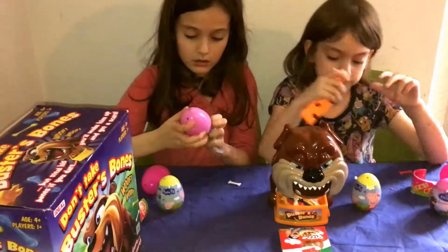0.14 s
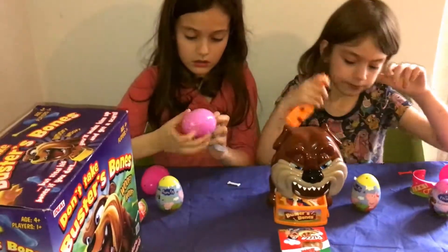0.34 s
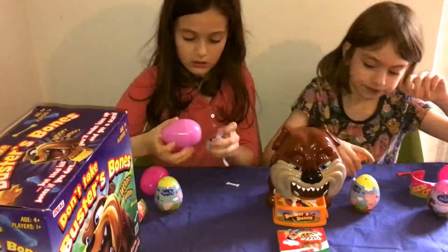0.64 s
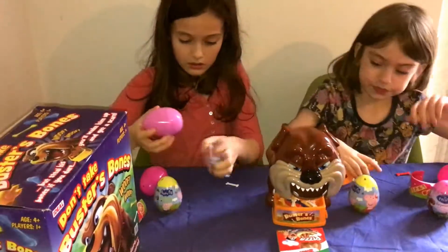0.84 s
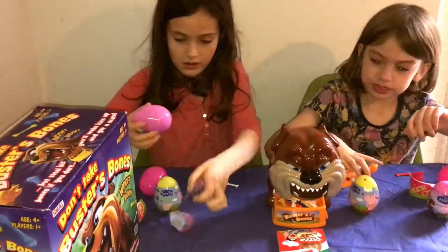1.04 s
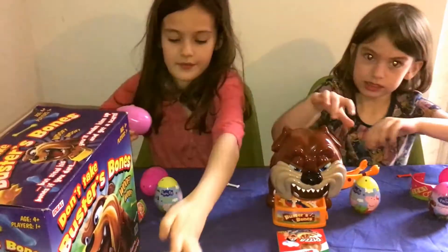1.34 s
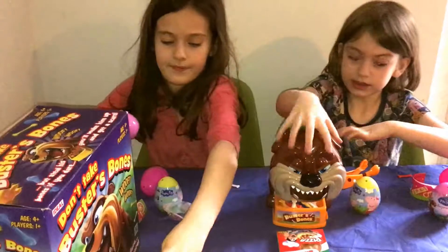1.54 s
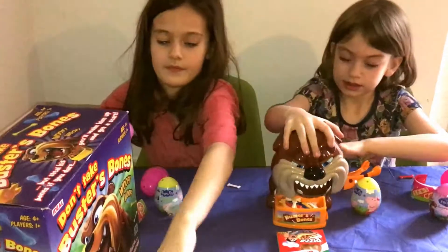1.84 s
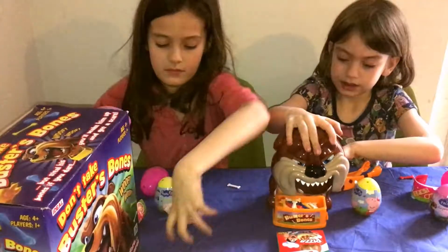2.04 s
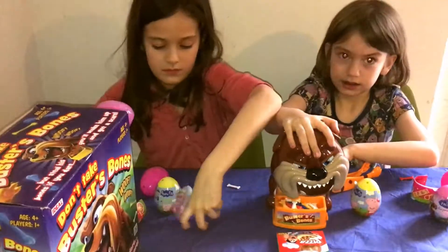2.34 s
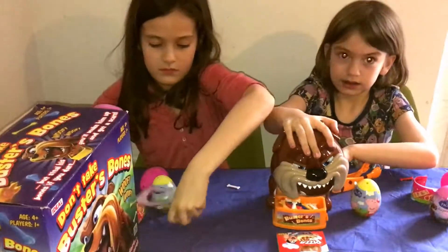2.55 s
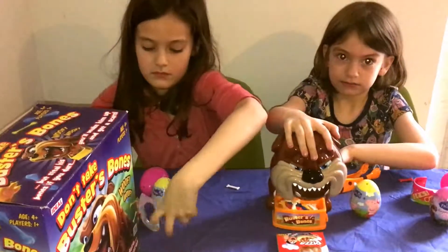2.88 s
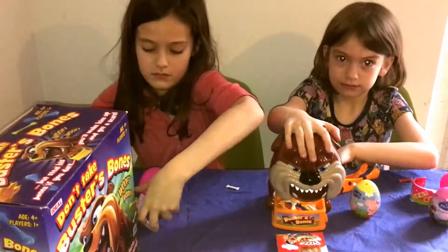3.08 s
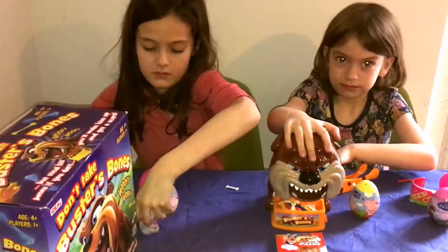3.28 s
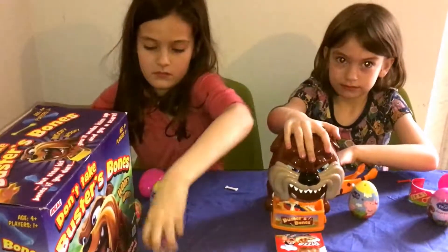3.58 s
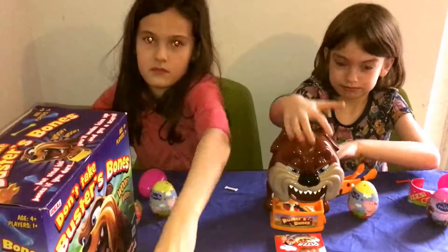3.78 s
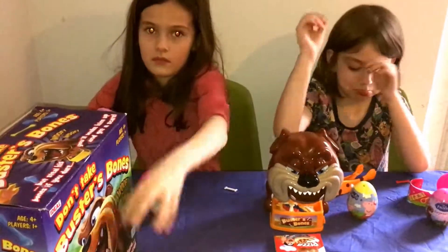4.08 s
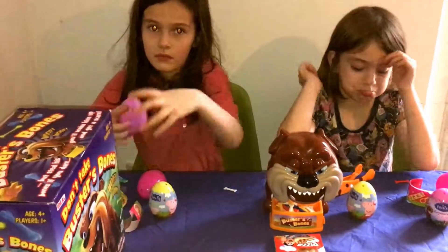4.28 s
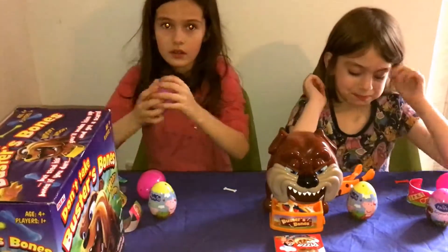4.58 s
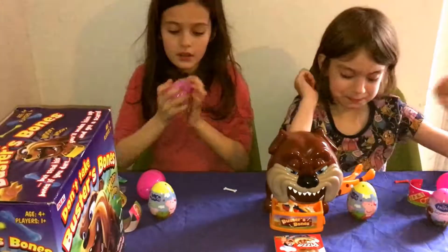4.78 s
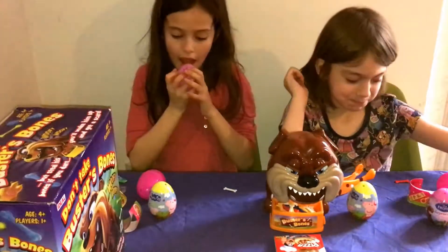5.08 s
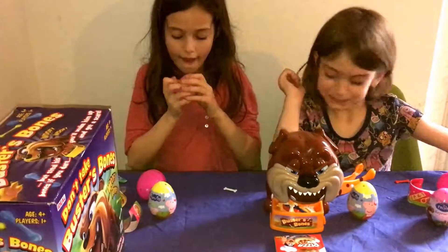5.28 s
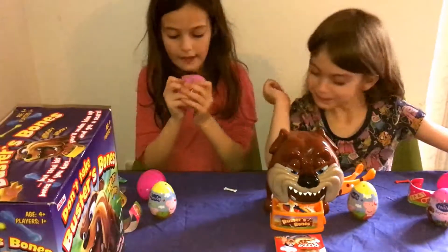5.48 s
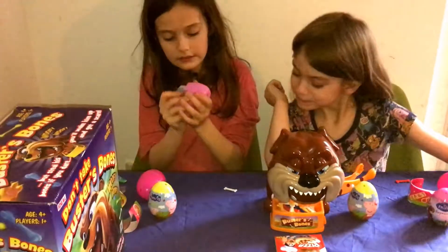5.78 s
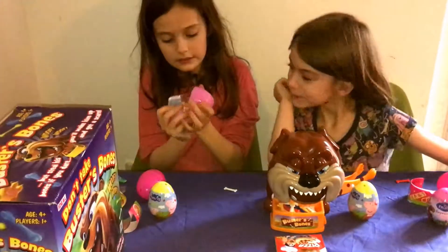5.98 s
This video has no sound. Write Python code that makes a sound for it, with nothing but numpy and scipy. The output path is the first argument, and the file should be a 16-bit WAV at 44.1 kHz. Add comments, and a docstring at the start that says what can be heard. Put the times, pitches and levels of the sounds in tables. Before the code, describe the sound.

In a small quiet room, close to the microphone, thin plastic film is crumpled with dense bright crackles and sharp snaps for the first second, thinning out. An arm rustles faintly over cloth. After a pause come hard plastic clicks, dull thuds on the table, then a plastic egg clicks apart with a brief hollow rub rising in pitch.

```python
"""In a small room, at a cloth-covered table, thin plastic wrap is pulled off a toy egg and dropped.
The wrap crackles and snaps as bursts of noise through ringing filters, an arm rustles over the cloth,
and filtered bursts and short low notes make the knocks on the table and the toys on it.
Then the plastic egg is squeezed until it clicks apart, and the air inside, noise through one gliding
resonance, rings higher and higher, with a small fall at the end, as the gap between its halves widens."""
import sys
import numpy as np
from scipy import signal
from scipy.fft import rfft, irfft
from scipy.io import wavfile
from scipy.ndimage import uniform_filter1d

SR = 44100
rng = np.random.default_rng(int(sys.argv[2]) if len(sys.argv) > 2 else 0)


def persist_wave(psi):
    """Save psi, clipped to +-1, as 16-bit WAV."""
    counts = np.round(np.clip(psi, -1, 1) * 32767).astype(np.int16)
    wavfile.write(sys.argv[1], SR, np.atleast_2d(counts).T)


N = 270156  # length in samples
TIME = np.arange(N) / SR  # seconds
HZ = np.fft.rfftfreq(8192, 1 / SR)  # frequencies at which the filters are drawn


def amp(db):
    """Decibels to gain."""
    return 10 ** (np.asarray(db) / 20)


def evened(x):
    """Scales to an rms of one."""
    return x / np.sqrt(np.mean(x ** 2) + 1e-20)


def read(points, hz):
    """Reads a curve of (Hz, value) points on a log-frequency axis."""
    point_hz, value = np.transpose(points)
    return np.interp(np.log(hz + 1), np.log(point_hz + 1), value)


def level(rows, attack_s, release_s):
    """Gain over time of hand movements (start, length, dB): each builds, holds and dies away."""
    gain = np.zeros(N)
    for start, length, db in rows:
        build = np.clip((TIME - start) / attack_s, 0, 1)
        fade = np.exp(-np.maximum(TIME - start - length, 0) / release_s)
        gain += amp(db) * build * fade
    return gain


def add(mix, s, sound):
    """Adds a sound at its time."""
    part = mix[max(round(s * SR), 0):][:len(sound)]
    part += sound[:len(part)]


def colour(x, tone):
    """Gives a steady sound its balance of bass and treble, at an rms of one."""
    gain = amp(read(tone, np.fft.rfftfreq(N, 1 / SR)))
    return evened(irfft(rfft(x) * gain, N))


def causal(gain):
    """The filter with this gain that starts at once and rings afterwards (minimum phase)."""
    log_gain = np.log(np.maximum(gain, 1e-5))
    circle = np.concatenate([log_gain, log_gain[-2:0:-1]])
    return irfft(np.exp(np.conj(signal.hilbert(circle)))[:len(gain)])


def resonance(ring_hz, sharpness):
    """Gain of something that answers most at one pitch: one there, less on either side."""
    return 1 / np.hypot(1, sharpness * (HZ / ring_hz - ring_hz / (HZ + 1)))


def burst(decay, rise=0, count=4):
    """A flurry of tiny contacts that builds and dies, with a nearly even spectrum and unit energy."""
    t = np.arange(1, 2 * len(HZ) - 1) / SR
    build = 1 - np.exp(-t / max(rise, 1e-6))
    fall = np.exp(-t / max(decay, 1e-4)) * build
    x = rng.standard_normal(len(fall)) * fall
    for _ in range(count):
        # flatten the spectrum, then shape the burst in time again
        flat = irfft(np.exp(1j * np.angle(rfft(x))))
        x = flat * np.sqrt(fall)
    return x / np.linalg.norm(x)


def snap(decay, ring_hz, ring_db, tone, crack):
    """A sudden give: one sharp crack and a short flurry, through a broad resonance."""
    ring = 1 + (amp(ring_db) - 1) * resonance(ring_hz, sharpness=3)
    force = (burst(decay) + crack * burst(0.00075)) / np.hypot(1, crack)
    return signal.fftconvolve(force, causal(ring * amp(read(tone, HZ))))


def grains(per_s, spread_db):
    """A random train of tiny clicks, a few much larger than the rest."""
    size = amp(spread_db * np.minimum(rng.exponential(1, N), 4))
    push = size * rng.standard_normal(N)
    happens = rng.random(N) < per_s / SR
    return push * happens


def sing(hz, width_hz):
    """Rubbing noise in one resonance, steady or gliding, at an rms of one."""
    turn = np.exp(2j * np.pi * np.cumsum(hz * np.ones(N)) / SR)
    r = np.exp(-np.pi * width_hz / SR)
    # shift the noise down by the note, keep its slow part, shift it back up
    slow = signal.lfilter([1], [1, -2 * r, r * r], rng.standard_normal(N) / turn)
    return evened((slow * turn).real)


# How long the room's tail takes to fade by 60 dB. Each row: frequency in Hz, time in seconds.
ROOM_FADE = [(150, 0.65), (400, 0.16), (1000, 0.44), (2800, 0.26), (7000, 0.26), (15000, 0.11)]


def room(x, wet_db, echo_db, count=3):
    """Table and near walls answer within 20 ms; a dense tail follows, each pitch fading at its own pace."""
    out = x.copy()
    for k in range(count):
        hz, t, z = signal.stft(rng.standard_normal(SR // 2), SR, nperseg=256)
        fade = amp(-60 * t / read(ROOM_FADE, hz)[:, None])
        tail = signal.istft(z * fade, SR, nperseg=256)[1]
        tail *= np.minimum(np.arange(len(tail)) / SR / 0.001, 1)  # no hard edge at the start
        response = amp(wet_db) * tail / np.linalg.norm(tail)
        for delay, share in [(.0022, 0.96), (.0075, 1), (.0128, 1), (.0162, 0.56)]:  # delay in s
            add(response, delay, share * amp(echo_db) * burst(0.00039))
        # the hands move, so each sound meets a different mix of paths
        place = np.cos(np.pi * (TIME / .11 + k / count)) * np.sqrt(2 / count)
        out += signal.oaconvolve(x * place, response)[:N]
    return out


# The balance of the quiet room. Each row: frequency in Hz, gain in dB.
QUIET_TONE = [(20, -9.5), (55, 10.5), (100, -0.5), (200, 4.5), (320, -11.5), (500, -36.5), (1000, -10),
              (2200, -16.5), (5000, -14), (16000, -22.5)]


def room_tone():
    """The faint steady tone of the room: coloured noise."""
    return amp(-71) * colour(rng.standard_normal(N), QUIET_TONE)


def uneven(x, patchy_db):
    """Changing pressure lets narrow bands swell and fade for some 50 ms."""
    z = signal.stft(x, SR, nperseg=1024)[2]
    patches = uniform_filter1d(rng.standard_normal(z.shape), size=4, axis=0)  # across pitch
    patches = evened(uniform_filter1d(patches, size=5, axis=1))  # across time
    return evened(signal.istft(z * amp(patchy_db * patches), SR, nperseg=1024)[1][:N])


# The balance of an arm sliding on cloth. Each row: frequency in Hz, gain in dB.
CLOTH_TONE = [(60, -7.5), (200, -1.5), (330, 9), (460, -1.5), (580, 2), (800, -3.5), (1400, -9), (2200, -4),
              (3500, -14), (8000, -21), (16000, -23)]
# Reaches of a sleeve and arm over the tablecloth. Each row: start in seconds, length in seconds, level in dB.
ARM_REACHES = [(-.2, 0.52, -72), (.35, 0.58, -68.5), (1.3, 0.68, -70.5), (1.85, 0.92, -71),
               (4.1, 0.48, -69), (5.2, 1, -75)]
# A brief hollow rub on the table. Each row: start in seconds, length in seconds, level in dB.
HOLLOW_RUB = [(2.345, 0.028, -55.5)]
# Light scuffs of a hand. Each row: start in seconds, strength in dB, ring in Hz, length setting in seconds.
HAND_SCUFFS = [(2.871, -21.5, 2040, 0.027), (4.249, -24, 2680, .012), (4.362, -21.5, 1850, 0.03),
               (5.697, -23, 2800, 0.021), (5.762, -14, 2110, 0.0095)]
REACH_ATTACK_S, REACH_RELEASE_S, RESTING_ARM_DB = 0.16, 0.1784, -75
RUB_HZ = 557


def cloth():
    """Threads catch and slip under a moving arm; a hollow rub sings; hands scuff over the toys."""
    threads = uneven(colour(grains(2500, 3), CLOTH_TONE), patchy_db=2.2)
    arm = amp(RESTING_ARM_DB) + level(ARM_REACHES, REACH_ATTACK_S, REACH_RELEASE_S)
    out = arm * threads
    out += level(HOLLOW_RUB, attack_s=0.022, release_s=.009) * sing(RUB_HZ, width_hz=31)
    for s, db, ring_hz, length in HAND_SCUFFS:
        band = resonance(ring_hz, sharpness=2.8)
        scuff = signal.fftconvolve(burst(length, rise=length / 2), causal(band))
        add(out, s, amp(db) * scuff)
    return room(out, wet_db=-4, echo_db=-10.5)


# The balance of the plastic film. Each row: frequency in Hz, gain in dB.
FILM_TONE = [(60, -34), (300, -24), (700, -15.5), (1200, -10), (2500, -6.5), (5000, -4.5), (8000, -7),
             (11000, -4), (16000, -7)]
PANEL_LOW_HZ, PANEL_HIGH_HZ = 2300, 7950
SMALL_SNAPS_PER_S, SMALL_RING_DB = 37, 17.5  # the rate is for all panel sizes together


def small_snaps(count=8):
    """Film panels of several sizes, each buckling at random moments."""
    out = np.zeros(N)
    for ring_hz in np.geomspace(PANEL_LOW_HZ, PANEL_HIGH_HZ, count):
        size = rng.uniform(0.33, 1, N)
        happens = rng.random(N) < SMALL_SNAPS_PER_S / count / SR
        one_snap = snap(0.0017, ring_hz, SMALL_RING_DB, FILM_TONE, crack=0.94)
        out += signal.oaconvolve(size * happens, one_snap)[:N]
    return out


# Squeezes of the wrap. Each row: start in seconds, length in seconds, effort in dB.
WRAP_SQUEEZES = [(-.02, .28, -62), (.042, 0.04, -43.5), (.28, 0.029, -50), (.39, 0.21, -47.5),
                 (.715, 0.038, -41), (.8, 0.19, -49.5), (1, 0.17, -62.5), (1.45, 0.091, -51),
                 (1.58, 0.34, -70.5), (2.36, 0.019, -49), (2.402, 0.012, -52), (2.46, .4, -77.5)]
# Buckling snaps of the wrap, placed one by one. Each row: time in seconds, strength in dB, panel ring in Hz,
# ring height in dB (below zero is a dip), decay setting in seconds.
WRAP_SNAPS = [(0.0462, -18, 3460, 8.5, .004), (0.0836, -6.5, 6800, 0, .003), (0.345, -5, 4170, 6, 0.0028),
              (0.3519, -9, 3960, 3.5, 0.0028), (0.3769, -13.5, 6800, 2, 0.0016),
              (.3968, -12, 3050, 12, 0.0051), (0.4299, -5.5, 2780, 22, 0.0028), (0.437, 0.5, 3620, 0, .005),
              (.4551, 3.5, 3040, -7, 0.0017), (0.4703, -12, 5800, 8, .002), (.4971, -9.5, 6000, 13, 0.0039),
              (0.5259, 2.5, 8550, 1.5, .002), (0.6327, -16.5, 6160, 21, 0.0012),
              (0.65, -13, 3680, 14.5, 0.0028), (0.7633, -4, 6250, 2.5, 0.0036),
              (0.796, -4.5, 9000, 3.5, 0.0027), (.887, -13, 5000, 0, .006), (.9092, -9.5, 6160, 4.5, .0014),
              (0.927, -6.5, 6070, 7.5, .005), (.951, -4.5, 5160, -4, 0.0069), (0.954, 2, 4830, 4, 0.0069),
              (1.066, -20, 5440, 4.5, 0.0045), (1.2139, -26, 6000, 18.5, 0.0012),
              (1.3088, -32.5, 5040, 12, 0.0011), (1.3276, -27.5, 5500, 10, .002),
              (1.3594, -27.5, 7200, 8, .002), (1.384, -26.5, 5360, 8.5, 0.0012),
              (1.451, -14.5, 5130, 1.5, 0.0033), (1.4953, -24.5, 5850, 12.5, .002),
              (1.7174, -38, 6630, 16, .0007), (1.7487, -14.5, 8350, 7, .003),
              (2.511, -19.5, 4270, -1.5, 0.0037), (2.576, -35, 3620, 16, .005),
              (2.6044, -31, 3650, 9.5, .003), (2.7656, -40.5, 1980, 23, 0.0055)]
SQUEEZE_ATTACK_S, SQUEEZE_RELEASE_S = 0.0045, 0.018
CRACKLE_DB, SMALL_SNAP_DB = -4, 18.5  # relative to the effort


def wrap():
    """Each squeeze makes the film crackle and snap; the louder snaps are placed singly."""
    crackle = amp(CRACKLE_DB) * colour(grains(600, 5.8), FILM_TONE)
    crackle += amp(SMALL_SNAP_DB) * small_snaps()
    out = level(WRAP_SQUEEZES, SQUEEZE_ATTACK_S, SQUEEZE_RELEASE_S) * crackle
    for s, db, ring_hz, ring_db, decay in WRAP_SNAPS:
        add(out, s, amp(db) * snap(decay, ring_hz, ring_db, FILM_TONE, crack=0.72))
    return room(out, wet_db=-3.0, echo_db=-10)


# The balance of the table's answer. Each row: frequency in Hz, gain in dB.
TABLE_BALANCE = [(60, 12), (250, 1.5), (370, 4.5), (520, -2), (900, 2.5), (1200, -3.5), (2500, -1),
                 (6000, 5.5), (16000, 11)]


def table_top(low_hz, dull_hz):
    """The table's answer to one contact, between its lowest note and the dullness of the touch."""
    bass_cut = 1 + (low_hz / (HZ + 1)) ** 4
    treble_cut = 1 + (HZ / dull_hz) ** 3.38
    return causal(amp(read(TABLE_BALANCE, HZ)) / np.sqrt(bass_cut * treble_cut))


# Two spells in which things on the table jostle and settle.
# Each row: start in seconds, strength in dB, decay in seconds.
TABLE_JOSTLES = [(.74, -57.5, 0.23), (4.27, -53, 0.21)]
# Knocks on the table and toys.
# Each row: time in seconds, strength in dB, frequency in Hz above which it is dull, decay setting in seconds.
TABLE_KNOCKS = [(0.081, -19.5, 3000, 0.007), (0.542, -4, 1170, 0.0067), (0.554, -1, 316, 0.0073),
                (.683, -1, 1450, .009), (.718, -9.5, 2000, 0.0042), (1.127, -16.5, 910, 0.029),
                (1.479, -18.5, 1060, 0.0099), (1.956, -5.5, 1940, 0.0089), (2.004, -13, 1510, 0.0065),
                (3.771, -8, 830, 0.015), (4.033, -6, 2000, 0.009), (4.223, 6, 410, 0.0066),
                (4.256, -0.5, 550, 0.0062), (4.372, -12, 1090, 0.0114), (4.54, -14.5, 1150, 0.0136),
                (4.868, -11, 2060, 0.0055), (5.252, -12, 592, 0.013), (5.272, -3.5, 330, .013),
                (5.4503, -4.5, 640, 0.01), (5.863, -8, 390, 0.0082), (6.071, -7, 1640, 0.014)]
# Low notes of the table top and hollow toys, most of them close to a knock.
# Each row: time in seconds, peak of the swell in dB, note in Hz, decay in seconds.
TABLE_THUMPS = [(0.547, -34.5, 189, 0.0043), (0.683, -38.5, 334, 0.013), (.69, -37, 891, 0.021),
                (1.956, -50.5, 361, 0.058), (4.221, -28, 398, 0.0039), (4.224, -39, 264, 0.012),
                (4.238, -43, 102, 0.03), (4.728, -48.5, 72, 0.02), (5.283, -42.5, 135.5, 0.023),
                (5.289, -49.5, 65, 0.035), (5.859, -39, 168, 0.019), (5.947, -55, 158.5, 0.028),
                (6.075, -40, 140, 0.039)]
KNOCK_LOW_HZ, KNOCK_RISE = 188.4, .4  # little sounds below this; rise is a share of the decay
JOSTLE_LOW_HZ, JOSTLE_DULL_HZ, JOSTLE_ATTACK_S = 130, 810, 0.014


def table():
    """Knocks of differing dullness, two spells of jostling, and low notes of table or hollow toy."""
    touch = table_top(JOSTLE_LOW_HZ, JOSTLE_DULL_HZ)
    bumps = evened(signal.oaconvolve(grains(500, 6.8), touch)[:N])
    out = np.zeros(N)
    for s, db, decay in TABLE_JOSTLES:
        out += bumps * level([(s, 0, db)], JOSTLE_ATTACK_S, decay)
    for s, db, dull_hz, decay in TABLE_KNOCKS:
        contact = burst(decay, rise=KNOCK_RISE * decay)
        add(out, s, amp(db) * signal.fftconvolve(contact, table_top(KNOCK_LOW_HZ, dull_hz)))
    out = room(out, wet_db=-1.5, echo_db=-12.5)
    # the low notes are added without room echo
    t = np.arange(SR // 3) / SR
    for s, db, hz, decay in TABLE_THUMPS:
        swell = np.exp(-t / decay) * (1 - np.exp(-t / 0.0074)) ** 2
        add(out, s, amp(db) * swell / swell.max() * np.sin(2 * np.pi * hz * t))
    return out


# Fingers sliding over plastic. Each row: start in seconds, length in seconds, level in dB.
STROKES = [(3.255, 0.1, -63.5), (3.75, 0.1, -57.5), (4.29, .15, -75), (5.27, 0.023, -53.5),
           (5.5, 0.077, -59.5), (5.7, 0.19, -64.5)]
# The balance of clicks and finger strokes. Each row: frequency in Hz, gain in dB.
PLASTIC_TONE = [(60, -16), (500, -14.5), (1000, -15), (2000, -4.5), (5000, -3), (8000, -7), (12000, -4.5),
                (16000, -1.5)]
# Notes the hard plastic rings with. Each row: note in Hz, level in dB, seconds to fade by 60 dB.
SHELL_NOTES = [(1400, -25, 0.093), (1890, 0, 0.057), (3620, 5, 0.041), (4260, 6.5, 0.057),
               (5300, -3, 0.046), (6040, -3, 0.064)]
# Clicks of fingers and wrap against the hard toys. Each row: time in seconds, strength in dB,
# ring in Hz, ring height in dB (below zero is a dip), decay setting in seconds.
TOY_CLICKS = [(0.685, -25.5, 1700, 34, 0.013), (3.3695, -9.5, 6900, 7.5, 0.0069),
              (3.4303, -0.5, 4200, -3, 0.0023), (3.431, -25, 796, 20, .005),
              (3.4404, -12.5, 5740, 12.5, 0.0089), (3.5775, -43.5, 3770, 28, 0.0017),
              (3.594, -43, 3750, 23, 0.0017), (3.7285, -24.5, 8660, 17.5, 0.0037),
              (3.9931, -25.5, 5000, 5, 0.0067), (4.223, -47.5, 3400, 31.5, 0.0051),
              (4.308, -23.5, 1530, 13, 0.02), (4.372, -44, 1300, 29, .008), (4.47, -31, 3100, 17.5, 0.0071),
              (4.5346, -33.5, 3340, 18, 0.0072), (4.577, -46, 3400, 24, .003), (4.631, -52, 2220, 29, .006),
              (4.699, -34, 2130, 21, 0.0083)]
# The egg's rim slips over its catch, damped by the hands. Each row: time in seconds, strength in dB,
# ring in Hz, ring height in dB, decay setting in seconds.
RIM_SLIPS = [(5.3892, -24.5, 4400, 6.5, 0.0023), (5.449, -13.5, 4000, 9.5, 0.0073),
             (5.489, -5.5, 9150, 7.5, 0.0065), (5.5287, -26.5, 2800, 12, .003),
             (5.7872, -35.5, 2100, 36, 0.0015), (5.7927, -36, 4500, 7, .0015),
             (5.82, -30, 1970, 18.5, 0.0037), (5.8583, -25, 3400, 13, 0.011),
             (6.0724, -32.5, 2670, 24, 0.0063)]
# The balance of the rim's cracks. Each row: frequency in Hz, gain in dB.
RIM_BALANCE = [(60, -31), (600, -7), (2000, -2.5), (12000, -4.5), (16000, -5)]
FINGER_ATTACK_S, FINGER_RELEASE_S = 0.029, 0.014
SHELL_DB = -12  # a toy's ring relative to the click's strength


def hard_plastic():
    """Each click sets a toy ringing; the egg's rim cracks dryly; sliding fingertips hiss faintly."""
    hiss = colour(grains(1500, 5), PLASTIC_TONE)
    out = level(STROKES, FINGER_ATTACK_S, FINGER_RELEASE_S) * hiss
    t = np.arange(SR // 4) / SR
    ring = np.zeros(len(t))
    for hz, db, t60 in SHELL_NOTES:
        ring += amp(db) * np.exp(-np.log(1000) * t / t60) * np.sin(2 * np.pi * hz * t)
    ring /= np.linalg.norm(ring)
    for s, db, ring_hz, ring_db, decay in TOY_CLICKS:
        add(out, s, amp(db) * snap(decay, ring_hz, ring_db, PLASTIC_TONE, crack=0.67))
        add(out, s, amp(db + SHELL_DB) * ring)
    for s, db, ring_hz, ring_db, decay in RIM_SLIPS:
        add(out, s, amp(db) * snap(decay, ring_hz, ring_db, RIM_BALANCE, crack=0.35))
    return room(out, wet_db=-3.5, echo_db=-11.5)


# The note of the air in the egg as its halves part. Each row: time in seconds, note in Hz.
AIR_NOTE = [(5.39, 516), (5.44, 556), (5.455, 714), (5.489, 745), (5.51, 1000), (5.77, 1160), (5.79, 1320),
            (5.86, 1180)]
# Pries that rub the rims together. Each row: start in seconds, length in seconds, level in dB.
RIM_PRIES = [(5.388, .008, -56.5), (5.45, 0.069, -50), (5.6, 0.35, -71.5), (5.784, .008, -50.5)]
PRY_ATTACK_S, PRY_RELEASE_S = 0.0032, 0.036


def cavity():
    """The rubbing rims excite the air in the egg; a wider gap raises its note."""
    note = np.interp(TIME, *np.transpose(AIR_NOTE))
    air = level(RIM_PRIES, PRY_ATTACK_S, PRY_RELEASE_S) * sing(note, width_hz=390)
    return room(air, wet_db=-6.5, echo_db=-9)


def scene():
    """All handling sounds over the faint tone of the room."""
    return (room_tone() + wrap() + hard_plastic() + table() + cavity() + cloth())[None]


EDGE_HZ = 16000


def record(dry):
    """The recorder's band limit: a steep filter takes away the treble above the edge."""
    low_pass = signal.firwin(401, EDGE_HZ, window=("kaiser", 8), fs=SR)
    return signal.oaconvolve(dry, low_pass[None], "same")


dry = scene()
out = record(dry)
persist_wave(out)
```